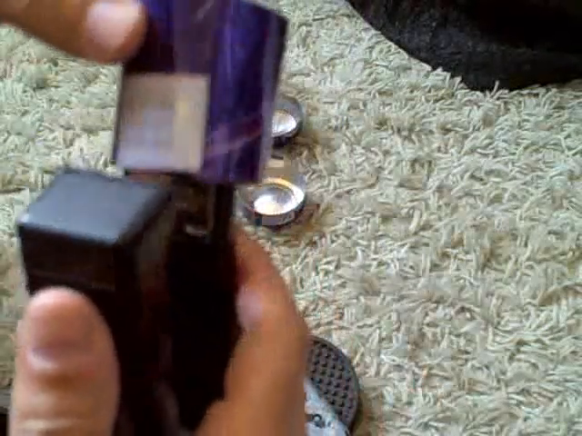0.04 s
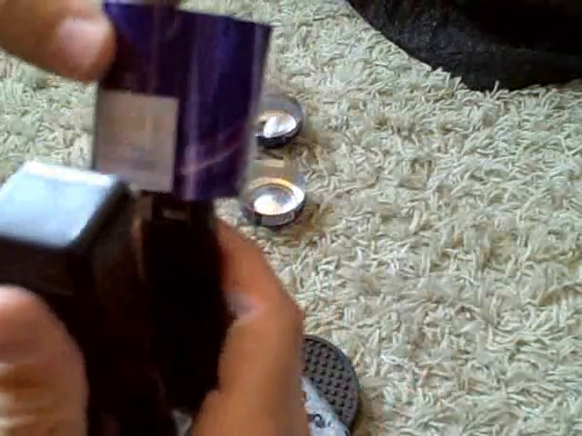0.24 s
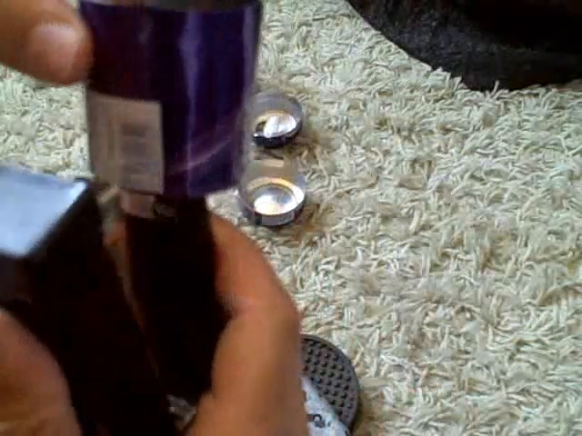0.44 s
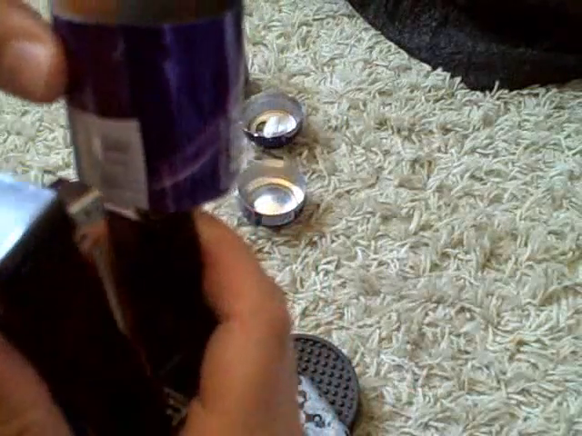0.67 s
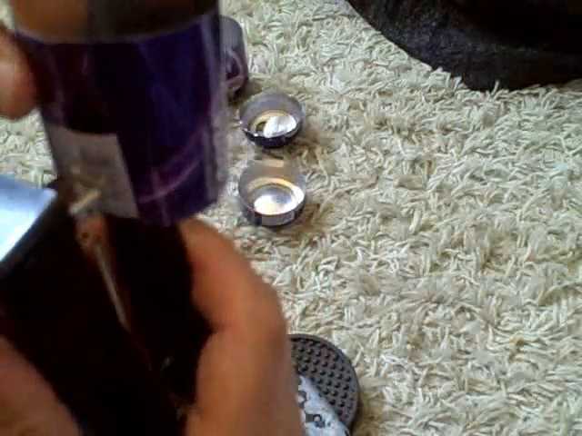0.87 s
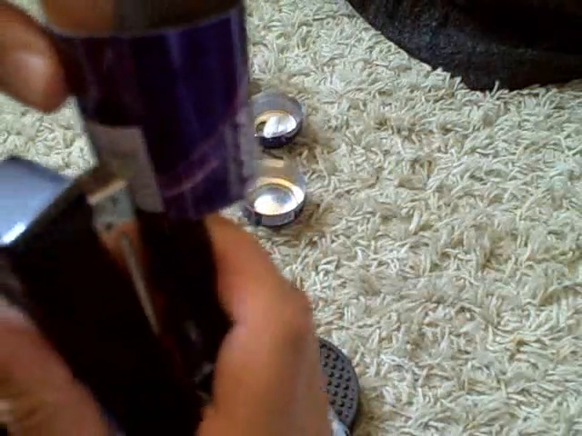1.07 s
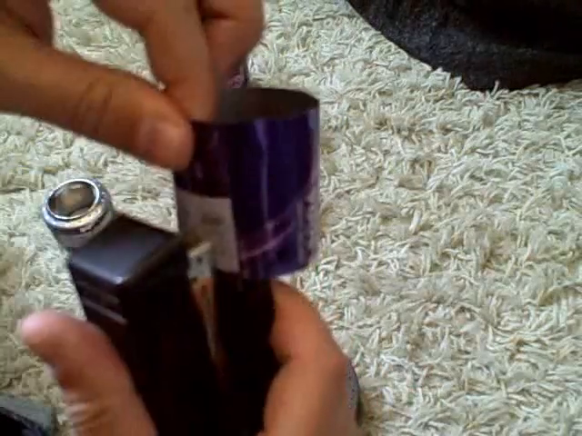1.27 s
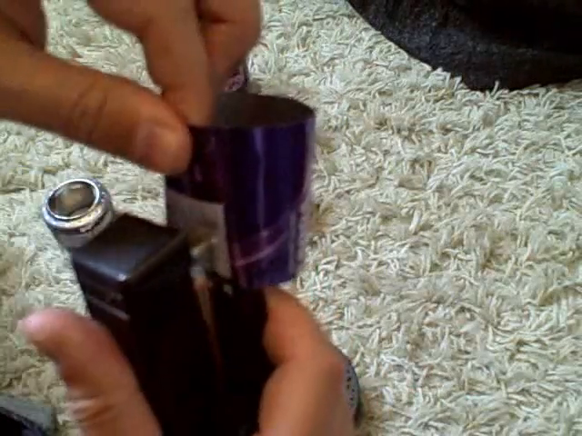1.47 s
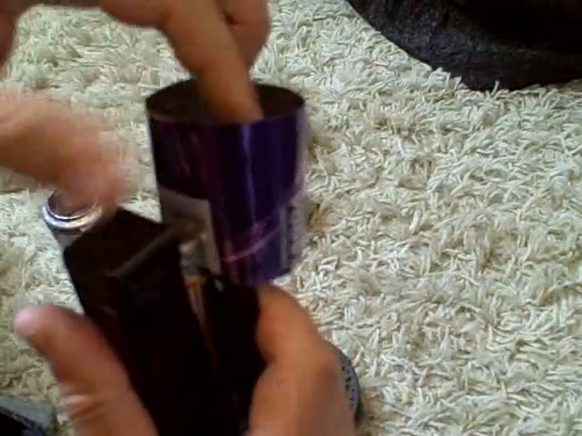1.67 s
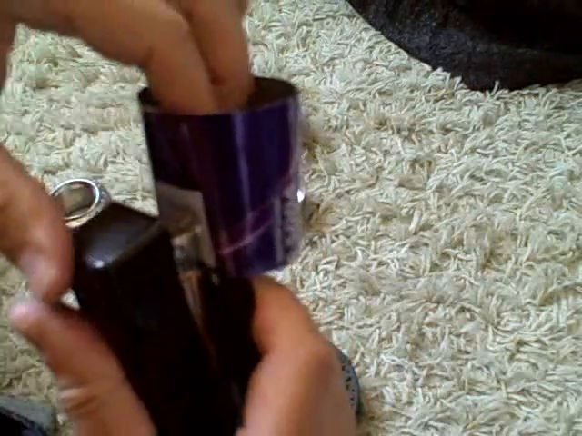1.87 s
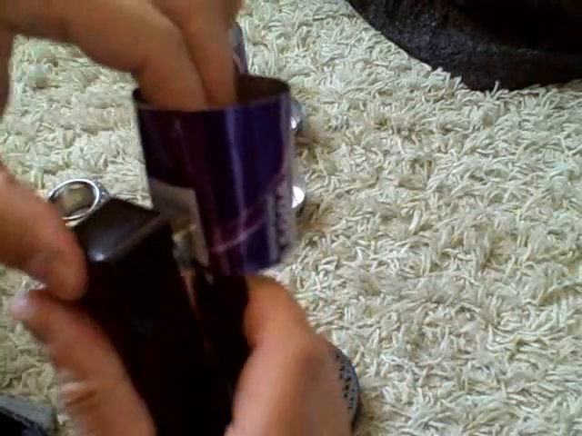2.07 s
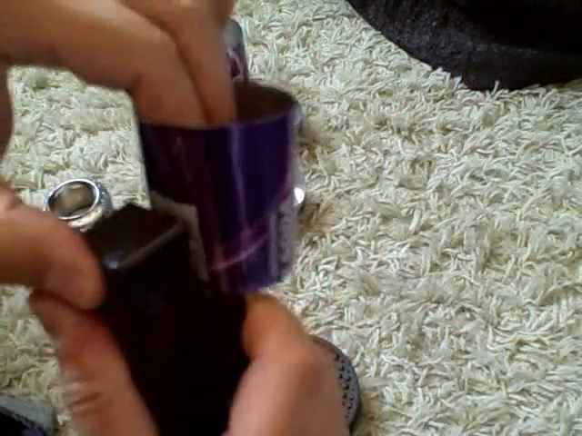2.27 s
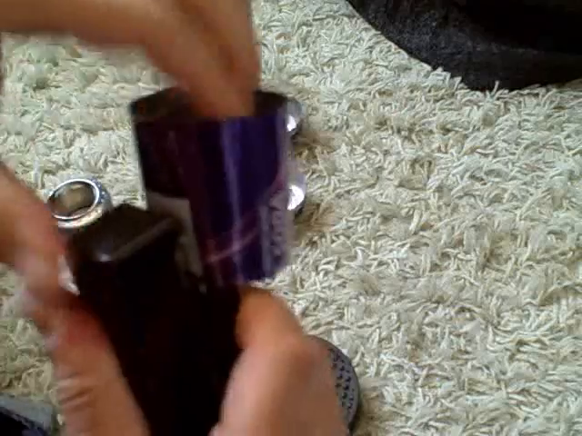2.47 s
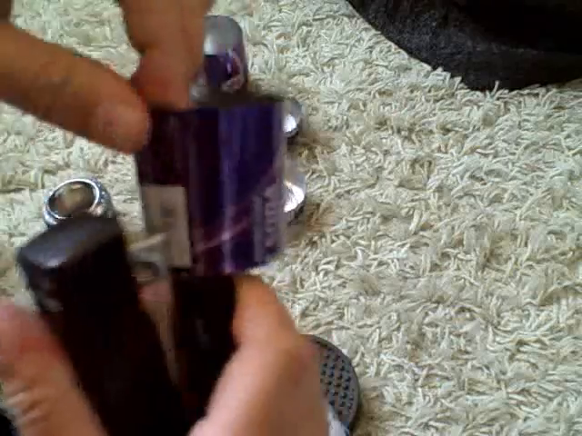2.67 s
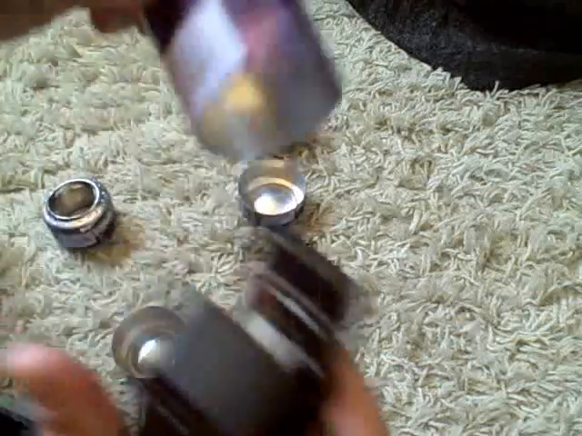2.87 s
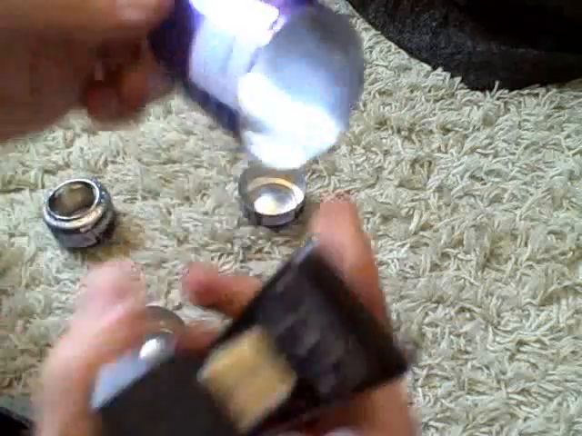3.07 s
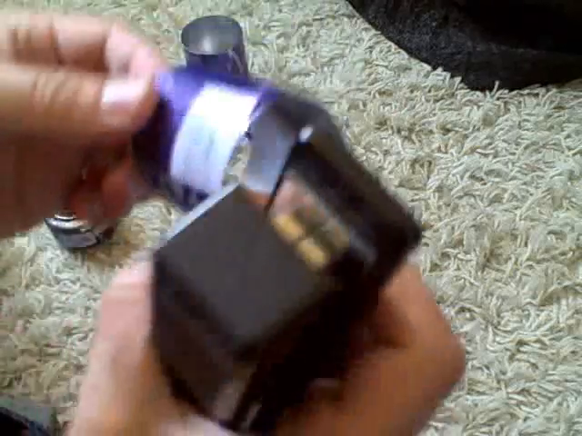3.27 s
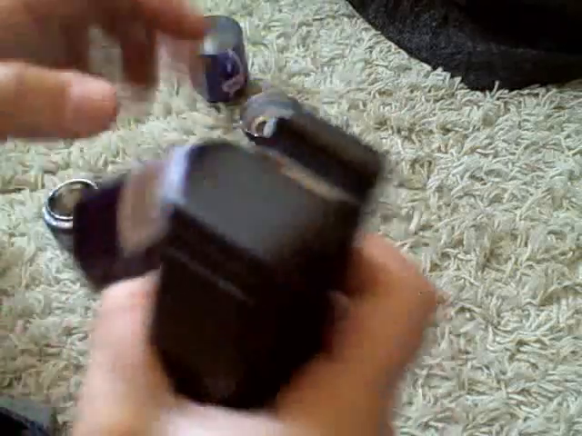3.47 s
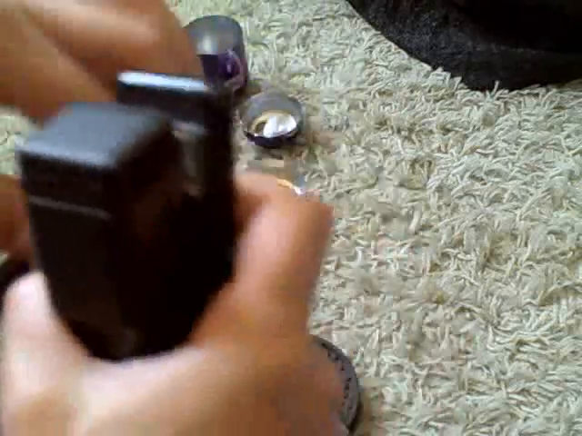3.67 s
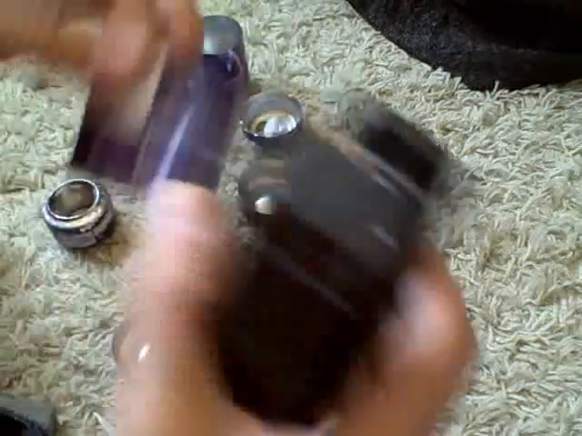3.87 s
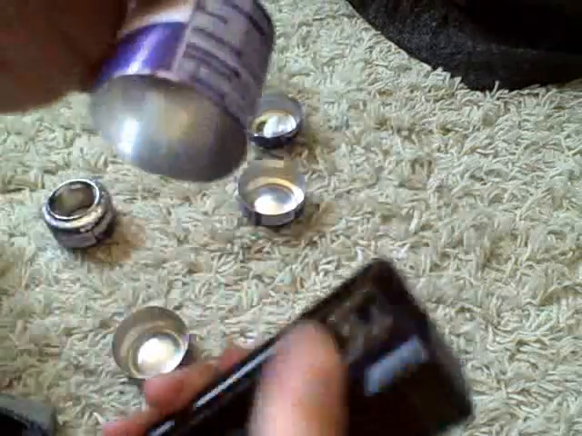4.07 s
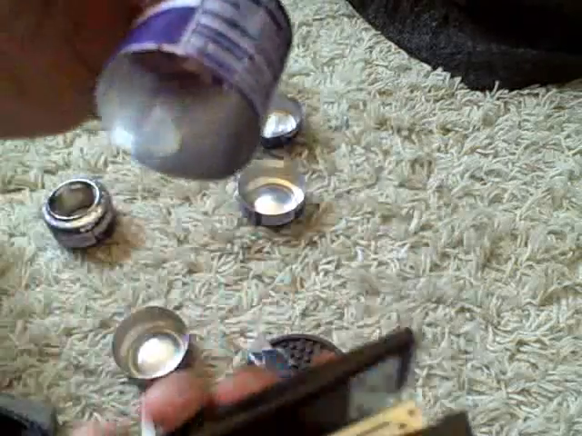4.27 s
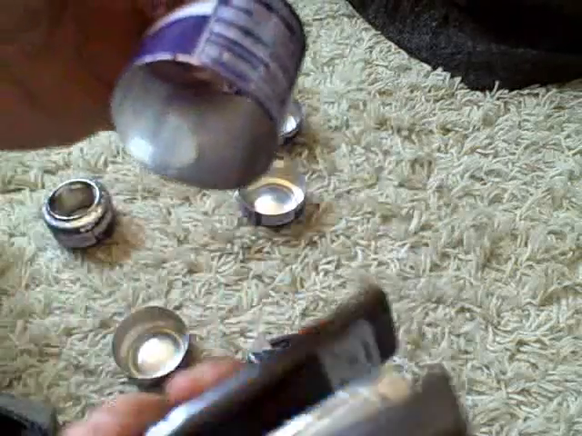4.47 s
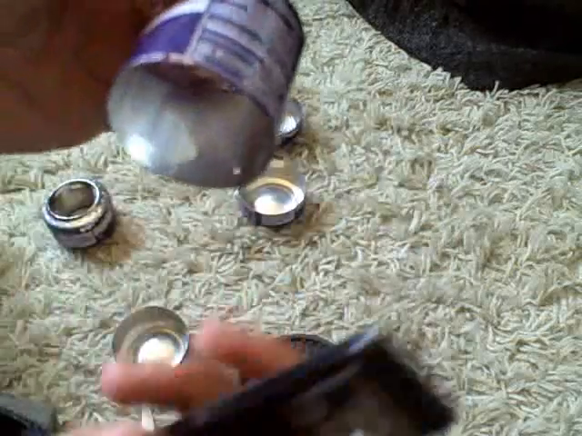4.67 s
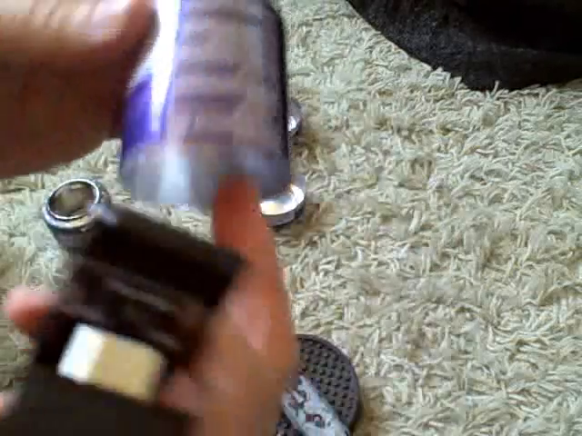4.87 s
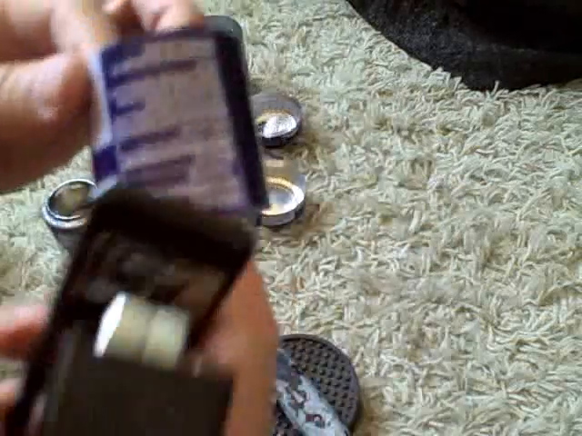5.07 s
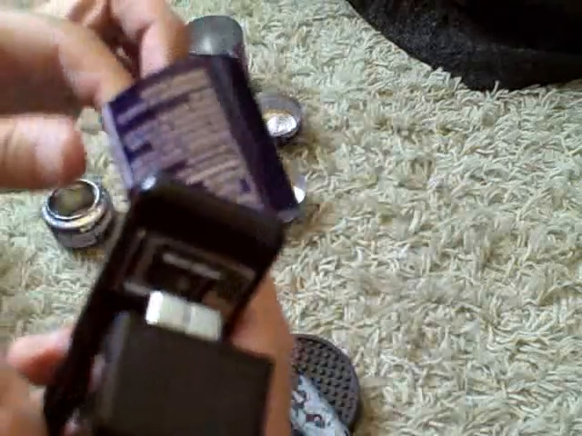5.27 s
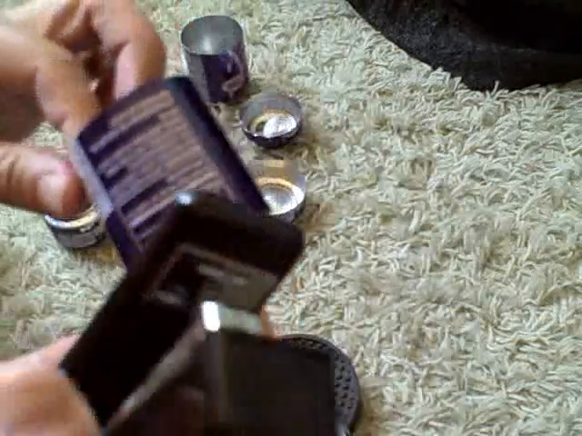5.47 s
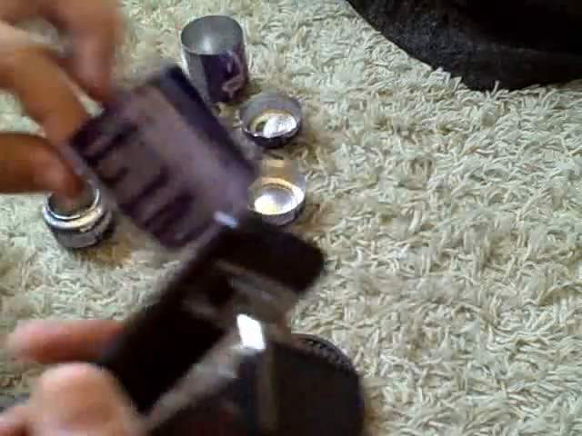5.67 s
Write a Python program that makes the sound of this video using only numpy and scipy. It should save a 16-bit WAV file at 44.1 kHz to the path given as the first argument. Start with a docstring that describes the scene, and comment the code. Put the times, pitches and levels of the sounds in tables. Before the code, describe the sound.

Close, sharp stapler clacks and a crumpling staple, surrounded by small metallic clicks and papery rustles of a thin aluminium ring being handled.

```python
"""Stapling a ring of can metal

A hand-held desk stapler is squeezed through a ring cut from an aluminium can, close by in a carpeted room.
Blows are noise bursts through body resonances, a soft touch then a seating; spring and case ring as dying sines.
The staple crumples in ever weaker snaps; the thin sheet ticks in pairs of contacts and slides as dense tiny slips.
Behind lie decaying-noise echoes, swaying rumble, hiss, steady tones and a faint whistle that comes and goes."""
import sys
import numpy as np
from scipy import signal
from scipy.fft import rfft, irfft
from scipy.io import wavfile

SR = 44100
rng = np.random.default_rng(int(sys.argv[2]) if len(sys.argv) > 2 else 0)


def wav_record(signal):
    """Record a signal, one row per channel, as 16-bit PCM in the file named by sys.argv[1]."""
    frames = np.transpose(np.atleast_2d(signal))
    bounded = np.clip(frames, -1, 1)
    # unit amplitude maps onto the largest positive 16-bit level
    quanta = np.round(bounded * 32767).astype(np.int16)
    wavfile.write(sys.argv[1], SR, quanta)


N = 252869
TIME = np.arange(N) / SR
BLOW_TIME = TIME[:SR // 10]

# quickly damped resonances of the stapler over a flat click: f/Hz, width/Hz, boost/dB
STAPLER_BODY = [(1310, 340, 8), (2240, 350, 5.5), (3220, 290, 5), (4313, 760, 8), (5120, 1000, 7),
                (5790, 600, 8.5), (6600, 1000, 6.5), (8300, 810, -6), (10140, 3300, 8.5),
                (10500, 2400, 3.5), (13700, 1800, -4)]
# quickly damped resonances of the thin sheet over a flat click: f/Hz, width/Hz, boost/dB
SHEET_BODY = [(1340, 250, 6.5), (2300, 500, 5), (3640, 700, 0), (4590, 550, 8), (5340, 650, 11.5),
              (6090, 800, 8.5), (8000, 720, -4.5), (10210, 1400, 10), (11200, 600, 3.5), (12700, 1100, -5)]


def from_db(db):
    """Turn decibels into an amplitude factor."""
    return 10 ** (np.asarray(db) / 20)


def rms_one(x):
    """Scale a signal to an rms of one."""
    return x / np.sqrt(np.mean(x ** 2) + 1e-20)


def at_hz(points, hz):
    """Read a table along a log-frequency axis."""
    table_hz, values = np.array(points).T
    return np.interp(np.log(np.maximum(hz, 1)), np.log(table_hz), values)


def add(track, s, sound):
    """Mix a sound in at time s."""
    start = round(s * SR)
    track[start:start + len(sound)] += sound[:N - start]


def drift(per_s):
    """Smooth random wandering with an rms of one, through per_s new values a second."""
    knots = rng.standard_normal(N // 20)
    return rms_one(np.interp(TIME * per_s, np.arange(len(knots)), knots))


def decay(t, t60):
    """Exponential fade that loses 60 dB in t60 seconds."""
    return np.exp(-np.log(1000) * t / t60)


def resonate(x, peaks):
    """Pass a sound through a chain of causal resonant peaks (f/Hz, width/Hz, boost/dB)."""
    sections = []
    for hz, width, db in peaks:
        height = from_db(db / 2)
        half = np.tan(np.pi * width / SR)
        c = -2 * np.cos(2 * np.pi * hz / SR)
        zeros = [1 + half * height, c, 1 - half * height]
        poles = [1 + half / height, c, 1 - half / height]
        sections.append(np.array(zeros + poles) / poles[0])
    return signal.sosfilt(sections, x)


def mode(hz, db, t60):
    """One struck mode: a sine dying away from its peak level."""
    t = TIME[:SR]
    return from_db(db - 60 * t / t60) * np.sin(2 * np.pi * hz * t)


def contact(level_db, chatter_t60, peaks, snap):
    """A sharp first touch and a dying burst of micro-impacts excite the body."""
    fade = decay(BLOW_TIME, chatter_t60)
    force = rng.standard_normal(len(BLOW_TIME)) * fade
    force /= np.linalg.norm(force)
    force[0] += snap
    # partly even out the burst's spectrum, then fade it again
    spectrum = rfft(force)
    force = irfft(spectrum / np.abs(spectrum) ** .6, len(force)) * fade ** .1
    sound = resonate(force, peaks)
    # the whole energy equals 3 ms at the given rms level
    return from_db(level_db) * sound / np.linalg.norm(sound) * np.sqrt(.003 * SR)


def background(whistle_db, whistle_s, sway_db):
    """Coloured noise, its rumble swaying, under steady sines and a regularly returning faint whistle."""
    # colour of rumble and hiss: f/Hz, relative density/dB per Hz
    noise_colour = [(12, -15.5), (22, -2), (45, -7.5), (75, -10.5), (125, -15), (170, -19), (400, -26.5),
                    (1000, -33), (2200, -39), (4000, -40.5), (8000, -43), (11000, -45.5), (14500, -48.5)]
    # mains hum and electronic whine: f/Hz, rms level/dB
    tones = [(120, -66.5), (7682, -79), (8317, -79)]
    noise_db = -55.5  # rms, before the rumble sways
    whistle_hz, whistle_first_s, whistle_every_s = 2052, .419, .499

    colour = from_db(at_hz(noise_colour, np.arange(N // 2 + 1) * SR / N))
    noise = from_db(noise_db) * rms_one(irfft(rfft(rng.standard_normal(N)) * colour, N))
    rumble = signal.sosfiltfilt(signal.butter(2, 180, fs=SR, output="sos"), noise)
    hiss = noise - rumble
    out = hiss + rumble * from_db(sway_db * drift(15))
    for hz, db in tones:
        out += from_db(db) * np.sqrt(2) * np.sin(2 * np.pi * (hz * TIME + rng.random()))

    t = TIME[:round(whistle_s * SR)]
    whistle = signal.windows.tukey(len(t)) * np.sin(2 * np.pi * whistle_hz * t)
    for s in np.arange(whistle_first_s, N / SR - whistle_s, whistle_every_s):
        add(out, s, from_db(whistle_db) * whistle)
    return out


def room(x, build_s, wall_s, wall_db):
    """Scattered echoes build up, swell with the nearest walls and die band by band."""
    # decay time of the echoes: f/Hz, t60/s
    room_t60 = [(150, 0.36), (600, .24), (1400, 0.23), (3000, 0.21), (5500, 0.19), (10000, 0.21),
                (15000, 0.097)]
    # colour of the echoes: f/Hz, level/dB
    room_colour = [(100, -5), (400, -2), (800, 1), (1400, 2.5), (3300, 1.5), (5500, -1.5), (10000, -2.5),
                   (14000, 5.5)]
    wall_spread_s = 0.0038

    t = TIME[:SR // 2]
    edges = np.geomspace(60, 17000, 15)
    white = rng.standard_normal((2, len(t)))  # neighbouring bands take turns with two noises
    echo = 0
    for k, (low, high) in enumerate(zip(edges, edges[1:])):
        hz = np.sqrt(low * high)
        band = signal.sosfilt(signal.butter(2, [low, high], "band", fs=SR, output="sos"), white[k % 2])
        echo = echo + band * from_db(at_hz(room_colour, hz)) * decay(t, at_hz(room_t60, hz))
    build_up = 1 - np.exp(-t / build_s)
    wall_swell = from_db(wall_db * np.exp(-((t - wall_s) / wall_spread_s) ** 2))
    echo = echo * build_up * wall_swell
    return signal.fftconvolve(x, echo / np.linalg.norm(echo))[:N]


def friction(grip_db):
    """How hard the sheet rubs: faintly under the shifting grip, more in the jaws and in each stroke."""
    # rubbing while the sheet is fed into the jaws and worked free: t/s, level/dB
    drag = [(1.25, -84), (1.54, -66.5), (1.69, -58.5), (1.77, -96), (2.22, -73), (2.5, -56.5), (2.6, -55),
            (2.68, -40.5), (2.75, -53), (2.87, -48), (3.08, -74), (3.18, -81.5), (3.22, -58), (3.48, -53),
            (3.62, -75), (3.76, -76), (3.86, -51), (3.93, -88)]
    # fingers stroke the ring as they turn it: middle t/s, length/s, level/dB
    strokes = [(0.49, .08, -71), (0.642, 0.11, -69), (4.086, 0.054, -51.5), (4.2, 0.1, -65.5),
               (4.294, .07, -64.5), (4.392, 0.057, -62.5), (4.629, .13, -63), (4.783, .12, -55.5),
               (4.936, .1, -57), (5.038, 0.072, -53), (5.22, 0.07, -53.5), (5.322, 0.19, -64),
               (5.518, 0.069, -60)]

    grip = from_db(grip_db + 2.1 * drift(6.3))
    pressure = grip + from_db(np.interp(TIME, *np.transpose(drag)))
    for middle, length, db in strokes:
        arch = np.cos(np.pi * np.clip((TIME - middle) / length, -.5, .5))
        pressure += from_db(db) * arch
    return pressure


def sheet_slides(pressure, slips_per_s, body_db, catch_db, catches_per_s):
    """Dense tiny slips excite the sheet, following the friction and catching unevenly."""
    slips = (rng.random(N) < slips_per_s / SR) * rng.standard_normal(N)
    slips = slips * from_db(catch_db * drift(catches_per_s))
    # fingertips damp the lower resonances and leave the upper ones singing
    touch = [(602.6, 3700, body_db), (2180, 300, 2), (4540, 700, -2.0),
             (6030, 700, 2.5), (10100, 900, 0), (14470, 1900, 3.5)]
    return pressure * rms_one(resonate(slips, SHEET_BODY + touch))


def rim():
    """Resonances of the sheet struck at a random point of its rim, which adds a pitch of its own."""
    low_hz, high_hz, width_hz, boost_db = 4240, 6070, 230, 4
    return SHEET_BODY + [(rng.uniform(low_hz, high_hz), width_hz, boost_db)]


def sheet_grit(pressure, count):
    """The cut edge snags at random moments, as hard as it is being rubbed."""
    grit_db, spread_db = -1, 5  # relative to the friction
    out = np.zeros(N)
    for at in rng.integers(0, N, count):
        snag = contact(grit_db + spread_db * rng.uniform(-1, 1), 0.01, rim(), snap=0.34)
        add(out, at / SR, pressure[at] * snag)
    return out


def sheet_ticks():
    """The rim of the sheet catches on a jaw and lets go: two contacts in quick succession."""
    # t/s, lets go after/s, level/dB, chatter t60 before evening out/s, body boost/dB, edge boost/dB
    ticks = [ (0.611, 0.0018, -57, .02, 22, -2), (0.665, 0.0016, -57, .02, 5, -4),
             (0.864, 0.0066, -36.5, 0.028, 5, 5), (1.231, 0.00096, -58, 0.02, 16, 4),
             (1.541, .001, -49, .012, -9, -2), (1.5819, 0.0017, -36, 0.015, -7.5, -4),
             (1.6615, .001, -55, .008, -7, 0), (1.6817, 0.0052, -33, .021, 1.5, 0.5),
             (2.468, 0.0013, -38, 0.0071, 13, 4.5), (2.514, 0.0009, -40.5, .018, 9, 4),
             (2.5328, 0.0012, -42, 0.016, -3, -3), (2.565, .001, -44.5, .025, -8, -4),
             (2.639, 0.0033, -41, .035, 13, -20), (2.8381, 0.0066, -26.5, 0.023, -0.5, 0),
             (2.885, 0.0039, -39.5, .03, -8, -1), (2.935, .001, -44, .008, 4, 3),
             (3.049, .001, -50, 0.017, 15, 1.5), (3.225, 0.00091, -40.5, 0.011, 11.5, 2),
             (3.2624, .001, -49.5, 0.009, -2, -4), (3.4857, 0.0032, -25.5, 0.014, -2.5, 2.5),
             (3.8318, .001, -45, .017, -3.5, 4), (4.086, 0.0076, -44, .012, -7, 5.5),
             (5.2013, 0.0058, -39, .016, -2, 2.5), (5.449, .001, -56, 0.014, -4, -1.5),
             (5.5199, 0.0096, -45.5, .007, -2.5, 1.5)]
    catch_db = -1.5  # relative to the letting go
    out = np.zeros(N)
    for s, held_s, level_db, chatter_t60, body_db, edge_db in ticks:
        peaks = rim() + [(1500, 5400, body_db), (11000, 10000, edge_db)]
        add(out, s, contact(level_db + catch_db, chatter_t60, peaks, snap=0.34))
        add(out, s + held_s, contact(level_db, chatter_t60, peaks, snap=0.25))
    return out


def ringing():
    """Spring and hollow case sound on after some of the blows, each mode a dying sine."""
    # steel channel and spring ringing on after a jolt: f/Hz, level relative to the jolt/dB, t60/s
    spring_modes = [(76.5, -32.5, 0.23), (102, -37.5, 1), (205, -49.5, 0.3), (312, -46, 0.25),
                    (438, -16.5, .045), (517, -60, 0.43), (677, -52.5, 0.7), (1005, -50, 1),
                    (1373.5, -37, .3), (2400, -31.5, 0.15), (3380, -32, 0.2), (3930, -30.5, 0.15),
                    (4638, -38, .2)]
    # jolts to the spring: t/s, level/dB
    jolts = [(2.307, 1.5), (2.6897, -15)]
    # hollow notes of the plastic case: t/s, f/Hz, level/dB, t60/s
    knocks = [(0.242, 136, -46.5, 0.5), (2.125, 1346, -20.5, 0.069), (2.688, 1311, -26.5, 0.16),
              (3.351, 1268, -36, .12), (3.888, 1354, -38.5, 0.16)]

    out = np.zeros(N)
    spring = sum(mode(hz, db, t60) for hz, db, t60 in spring_modes)
    for s, db in jolts:
        add(out, s, from_db(db) * spring)
    for s, hz, db, t60 in knocks:
        add(out, s, mode(hz, db, t60))
    return out


def staple(count):
    """The legs fold against the anvil in uneven, ever weaker snaps."""
    # the crumpling begins: t/s, first snap level/dB
    start_s, first_db = (2.318, -14.5)
    step_s, loss_db, chatter_t60_s = 0.0078, 2.5, .025  # step and loss from snap to snap
    out = np.zeros(N)
    for k in range(count):
        s = start_s + step_s * (k + rng.uniform(-.5, 0.24))
        add(out, s, contact(first_db - k * loss_db, chatter_t60_s, STAPLER_BODY, snap=0.19))
    return out


def stapler(low_note_db, high_note_db):
    """Steel and plastic touch and seat; returns the direct sound and what goes into the room."""
    # blows: t/s, seats after/s, level/dB, chatter t60 before evening out/s, thud/dB, case/dB, clank/dB,
    # edge/dB (boosts), low note f/Hz, high note f/Hz, room send/dB
    clacks = [ (0.231, 0.0091, -23, 0.03, 6.5, -3, 4, 0, 2370, 5050, -14),
              (2.1149, .0085, -7.5, 0.026, -2, 4.5, 1.5, -.5, 3380, 5270, -10.5),
              (2.1652, 0.00095, -13.5, 0.012, 5.5, 7.5, 0.5, .5, 4070, 6700, -14.5),
              (2.2082, .001, -21, .015, -3, 0.5, 3, -2.5, 2329, 5010, -13.5),
              (2.307, .002, 2.5, 0.031, 5.5, 0, 1, -0.5, 2530, 4850, -11),
              (2.685, .0023, -1.5, .026, -3.5, -7.5, -7, -2.5, 2810, 5890, -10.5),
              (3.349, .0019, -12.5, 0.011, -9, 18.5, -6, 0.5, 2040, 6110, -11),
              (3.8852, .0022, -19.5, 0.017, -2, 0.5, 5.5, 0.5, 4280, 6046, -12)]
    touch_db, touch_t60_s = -6.5, 0.018  # the first touch, relative to the blow
    lead_in_db, lead_in_rise_s = -24, 0.018  # peak relative to the blow, time to swell by 60 dB

    direct, spread = np.zeros(N), np.zeros(N)
    swell = decay(BLOW_TIME, lead_in_rise_s)[::-1]
    for (s, seat_s, level_db, chatter_t60, thud_db, case_db, clank_db, edge_db,
         low_hz, high_hz, room_db) in clacks:
        colour = [(343, 420, thud_db), (1216.6, 360, case_db),
                  (2570, 790, clank_db), (11000, 6000, edge_db)]
        # the point of contact favours two resonances of the steel
        notes = [(low_hz, 300, low_note_db), (high_hz, 450, high_note_db)]
        peaks = STAPLER_BODY + colour + notes
        # a brief noise swells into each blow
        lead_in = swell * rms_one(resonate(rng.standard_normal(len(swell)), peaks))
        blow = np.zeros(N)
        add(blow, s - len(lead_in) / SR, from_db(level_db + lead_in_db) * lead_in)
        add(blow, s, contact(level_db + touch_db, touch_t60_s, peaks, snap=0.25))
        add(blow, s + seat_s, contact(level_db, chatter_t60, peaks, snap=0.18))
        direct += blow
        spread += from_db(room_db) * blow
    return direct, spread


def scene():
    """Stapler and sheet close by, with the room and its background behind them."""
    clacks, spread = stapler(low_note_db=5.5, high_note_db=6.5)
    pressure = friction(grip_db=-76.0)
    slides = sheet_slides(pressure, slips_per_s=6000, body_db=-2.5, catch_db=2.75, catches_per_s=130)
    small_sounds = staple(count=10) + sheet_ticks() + sheet_grit(pressure, count=150) + slides
    echoes = room(spread + from_db(-11.5) * small_sounds, build_s=.001, wall_s=0.014, wall_db=1.5)
    floor = background(whistle_db=-70, whistle_s=.033, sway_db=3.5)
    return (clacks + ringing() + small_sounds + echoes + floor)[None]


def record(dry):
    """The input clips at full scale; then the microphone dulls the top and a steep low-pass cuts it."""
    # dull spots of the microphone: f/Hz, width/Hz, level/dB
    dull_spots = [(13000, 4500, -4), (14400, 2000, -3.5)]
    cutoff_hz = 15200
    clipped = np.clip(dry, -1, 1)
    coloured = resonate(clipped, dull_spots)
    return signal.sosfilt(signal.ellip(10, .2, 70, cutoff_hz, fs=SR, output="sos"), coloured)


dry = scene()
out = record(dry)
wav_record(out)
```